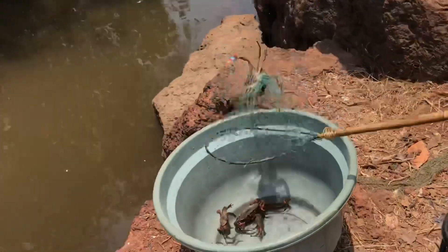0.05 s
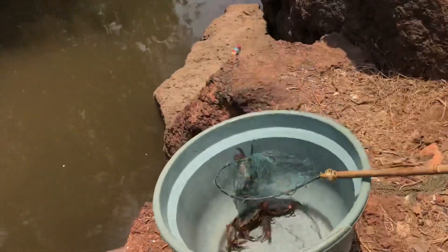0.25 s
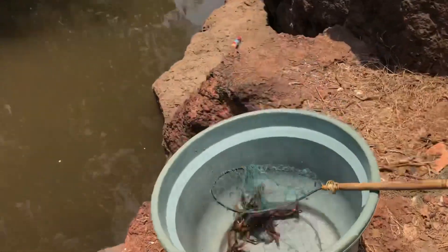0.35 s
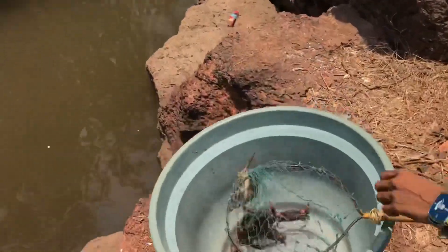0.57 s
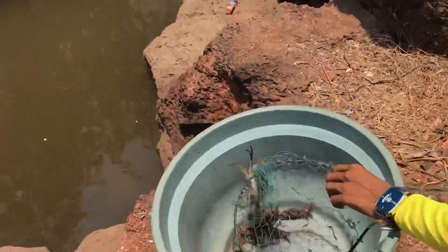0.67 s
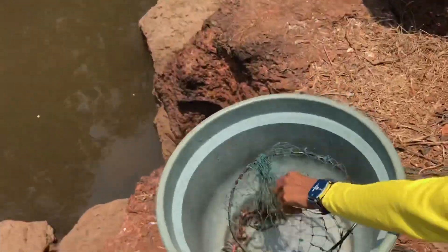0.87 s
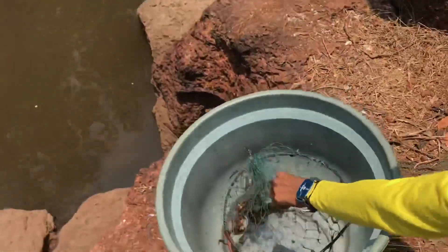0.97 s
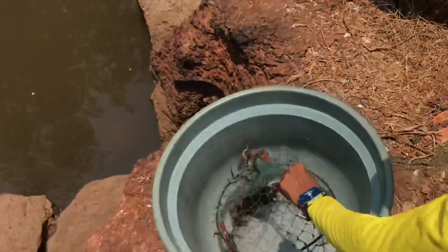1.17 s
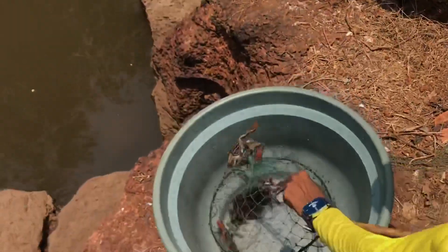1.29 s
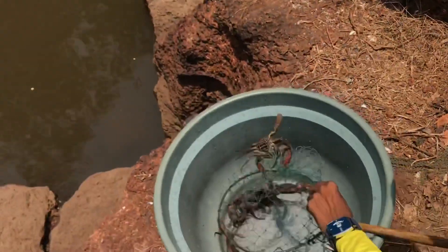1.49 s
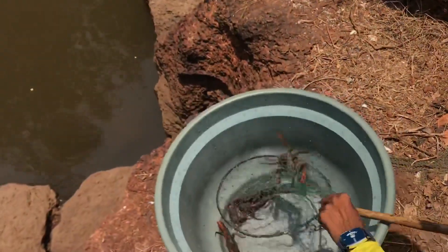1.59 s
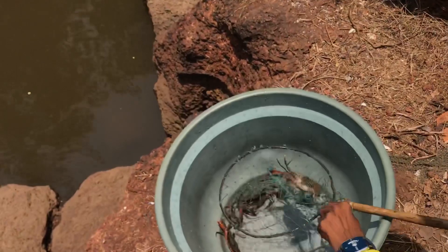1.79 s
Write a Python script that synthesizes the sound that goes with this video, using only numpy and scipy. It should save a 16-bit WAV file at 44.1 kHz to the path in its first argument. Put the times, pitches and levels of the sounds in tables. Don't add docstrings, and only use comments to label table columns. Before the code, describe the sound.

A net of crabs drops into a plastic tub: wet mesh crackles faintly, then at 0.2 s hoop and shells hit with a loud hollow clatter and short floor thump, rattling and scrabbling until about 0.5 s. Sparse snaps and ticks follow. From 1.1 s the net is handled, with a heavy knock at 1.16 s and separate knocks near 1.37, 1.57 and 1.7 s. Close, short tub echo, faint low hum and distant insects.

```python
import sys
import numpy as np
from scipy import signal
from scipy.fft import rfft, irfft
from scipy.io import wavfile
from scipy.ndimage import uniform_filter1d

SR = 44100
rng = np.random.default_rng(int(sys.argv[2]) if len(sys.argv) > 2 else 0)


def wav_record(signal):
    frames = np.transpose(np.atleast_2d(signal))
    bounded = np.clip(frames, -1, 1)
    quanta = np.round(bounded * 32767).astype(np.int16)
    wavfile.write(sys.argv[1], SR, quanta)


def gain_from_db(level_db):
    decades = np.asarray(level_db, float) / 20
    return 10 ** decades


N = 81585
T = np.arange(N) / SR

# [f/Hz, level/dB per Hz]
AIR_COLOUR = [(40, 5), (110, -2.5), (300, -13.5), (1000, -18), (3000, -20.5), (9000, -23.5), (11600, -35),
              (15500, -28.5)]
INSECT_BANDS = [6650, 7100, 7600]
# [t/s, level/dB]
HUM_LEVEL = [
    (0, -61.5),
    (.2, -63.5),
    (1.3, -52.5),
    (1.85, -62.5),
]
# [t/s, level/dB, share of bright mesh/dB]
ACTIVITY = [(0, -68, 12), (0.168, -69.5, -5), (0.208, -36.5, -1.5), (0.329, -41.5, 4.5), (.41, -54.5, 3),
            (.62, -58.5, 13), (1.0, -69, 10.5), (1.087, -53.5, 9), (1.111, -56.5, 11), (1.28, -50, -2),
            (1.35, -44, 2.5), (1.44, -52.5, 3), (1.5, -57, 9), (1.66, -54.5, -5), (1.688, -49.5, 0.5),
            (1.76, -55.5, 3.5), (1.85, -64, 4)]
# [f/Hz, level/dB per Hz]
LEG_COLOUR = [(500, -10), (1000, 7), (1800, 0.5), (3000, -2.5), (5000, -2.5), (9000, -27)]
# [f/Hz, level/dB per Hz]
MESH_COLOUR = [(1760, -10.5), (3000, -4.5), (8750, -6.5), (10200, -4.5), (15100, -3.5), (16500, -1)]
# [f/Hz, level/dB per Hz]
SHELL_COLOUR = [(590, -5.5), (1200, -2.5), (2700, -13), (3520, -8.5), (9000, -29), (11700, -34.5),
                (19800, -120)]
# [t/s, peak level/dB, f/Hz, length/ms]
TICK_EVENTS = [(0.2302, -23, 2200, 3.4), (0.237, -28, 4670, 5), (0.2558, -29.5, 4200, 2.8),
               (0.2915, -34, 1500, 3.6), (0.309, -25, 1250, 6.2), (0.3492, -36, 3040, 6.6),
               (0.431, -51, 2400, 4.2), (0.4678, -41.5, 2400, 4.6), (0.484, -39, 4570, 2.7),
               (0.5636, -39.5, 2960, 4), (0.5895, -41, 2900, 2.3), (0.717, -43.5, 1710, 7.8),
               (0.801, -47, 4030, 1.5), (0.8216, -46.5, 1930, 4.4), (0.835, -47, 12500, 2),
               (0.8986, -46.5, 2200, 1.4), (1.075, -41, 3800, 15), (1.082, -39.5, 7100, 8.9),
               (1.1295, -38, 2080, 2.8), (1.2176, -41.5, 4130, 4.4), (1.263, -39, 12000, 2.6),
               (1.273, -26.5, 4200, 2.6), (1.2733, -20, 9800, 2.7), (1.2805, -38, 3000, 4),
               (1.288, -35, 2550, 4), (1.3206, -44, 2500, 1.8), (1.3368, -33, 1510, 3),
               (1.339, -35, 14500, 4.4), (1.3448, -34.5, 4100, 5), (1.3652, -29.5, 2220, 1.8),
               (1.4003, -30.5, 4900, 2.2), (1.4255, -34.5, 1880, 4.3), (1.436, -42, 4160, 12),
               (1.6237, -46, 2960, 12), (1.632, -46, 12100, 1.7), (1.671, -55, 2200, 10),
               (1.6772, -38, 2390, 5.5), (1.684, -39, 2000, 6.7), (1.6886, -44, 2500, 5.1),
               (1.693, -39, 2200, 6.8), (1.702, -27.5, 3770, 3.3), (1.718, -42, 4000, 2.1),
               (1.7522, -37, 1760, 7.6), (1.8033, -40.5, 6400, 1.8)]
# [t/s, peak level/dB, length/ms]
SNAP_EVENTS = [(0.087, -40, 4.3), (0.153, -25, 18), (0.204, -21, 2.3), (0.22, -28, 4.1), (0.2804, -41, 5.2),
               (0.284, -13.5, 4.1), (0.308, -25, 2.9), (0.43, -27, 3.2), (0.46, -36, 4.3),
               (0.467, -32.5, 4), (0.562, -37.5, 3.6), (0.6597, -36.5, 3.3), (0.669, -32.5, 7.2),
               (0.675, -38, 5.8), (0.681, -40, 5), (0.7458, -32.5, 2.6), (1.1306, -24, 2.3),
               (1.1364, -22, 4.8), (1.1461, -21, 7.4), (1.1743, -30, 3.7), (1.2186, -35.5, 7.5),
               (1.271, -29, 3.3), (1.2731, -17, 1.4), (1.2805, -20.5, 2), (1.296, -26.5, 5.5),
               (1.3058, -29, 6.2), (1.3115, -37, 2.5), (1.333, -30.5, 2.7), (1.3635, -41, 1.5),
               (1.3765, -39, 2.9), (1.4225, -34.5, 7.5), (1.4439, -29.5, 4.5), (1.6495, -34, 7),
               (1.6886, -33, 4), (1.7, -35, 2.7), (1.7035, -16.5, 1.9), (1.7077, -32, 2.4),
               (1.715, -31, 3.6), (1.767, -40, 5)]
# [t/s, peak level/dB, f/Hz, length/ms]
CLACK_EVENTS = [(0.0117, -31, 3630, 0.85), (0.157, -35, 1780, 14), (0.197, -23, 3690, 14),
                (0.2029, -11.5, 2220, 3.4), (0.221, -12.5, 1890, 3.9), (0.2565, -21.5, 1560, 4.6),
                (0.2815, -16.5, 3560, 7.1), (0.2847, -18, 3500, 3.8), (0.3091, -27, 3870, 9.6),
                (0.339, -24.5, 1370, 9), (0.43, -35, 5400, 5.2), (0.5244, -31, 3350, 3.2),
                (0.747, -45, 2280, 6.5), (1.077, -43, 1750, 8.4), (1.141, -33.5, 2080, 8.9),
                (1.1607, -21, 1840, 4.5), (1.311, -36, 1900, 4.1), (1.373, -25, 1580, 3),
                (1.4415, -28.5, 4920, 8.3), (1.566, -32.5, 1647, 4.4), (1.7429, -37, 1490, 9.1),
                (1.8042, -32.5, 2800, 2.4)]
# [t/s, peak level/dB, f/Hz, t60/s]
BOOM_EVENTS = [(0.202, -12.5, 193, 0.028), (0.237, -26, 152, 0.063), (0.342, -24, 246, 0.049),
               (0.362, -32.5, 161.7, 0.13), (0.452, -33.5, 256.7, 0.15), (1.163, -27, 164.7, 0.19),
               (1.165, -28, 271.7, 0.085), (1.22, -39, 133, 0.16), (1.282, -35, 240.4, 0.16),
               (1.339, -35.5, 260, 0.34), (1.394, -41, 190.6, 0.21), (1.461, -41, 107, 0.063),
               (1.566, -26.5, 161, 0.15), (1.694, -40, 164, 0.16), (1.785, -42.5, 183, 0.12)]
# [f/Hz, level/dB, t60/s]
WALL_MODES = [(615, -7, .06), (700, -8, .04), (830, -6, .035), (1050, -10, .03), (1280, -7, .04),
              (1850, -18, .025)]
# [t/s, peak level/dB, f/Hz of the struck panel, contact/ms]
KNOCK_EVENTS = [(0.2, -15.5, 532, 0.95), (0.205, -19.5, 650, 2), (0.222, -15.5, 567, 2.04),
                (0.237, -20, 610, 1.7), (0.257, -26.5, 598, 4), (0.281, -24, 1070, 2.2),
                (0.287, -26.5, 634, 6.5), (0.308, -27.5, 1050, 4.7), (0.326, -22.5, 640, 0.91),
                (0.338, -20, 731, 7.6), (0.35, -22.5, 602, 3.1), (0.39, -30, 640, 2.3),
                (0.447, -37, 637, 5.7), (0.633, -49, 667, 2.9), (0.819, -51, 683, 6.2),
                (1.085, -46, 436, 5.3), (1.147, -36, 996, 3.2), (1.159, -27, 1060, 8.7),
                (1.162, -14.5, 808, 2), (1.169, -17.5, 675, 5.3), (1.214, -29, 790, 2.4),
                (1.261, -40.5, 760, 2.5), (1.274, -35, 950, 3), (1.288, -35, 910, 1.5),
                (1.32, -30.5, 750, 2.4), (1.336, -27.5, 780, 2), (1.345, -44, 780, 1.3),
                (1.362, -40, 835, 2.2), (1.372, -17.5, 876, 1.05), (1.38, -27.5, 665, 5.3),
                (1.497, -50, 874, 6.6), (1.52, -44.5, 780, 6.6), (1.568, -19.5, 762, 1.9),
                (1.643, -36, 866, 2.2), (1.688, -38, 890, 6.7), (1.783, -38.5, 760, 2.1),
                (1.813, -28, 745, 3.5)]


def evened(x):
    return x / np.sqrt(np.mean(x ** 2) + 1e-20)


def peaked(x):
    return x / (abs(x).max() + 1e-20)


def colour(x, spectrum):
    f, db = np.transpose(spectrum)
    hz = np.fft.rfftfreq(len(x), 1 / SR) + 1
    skirt_db = -18 * np.maximum(np.log2(f[0] / hz), 0)
    gain = gain_from_db(np.interp(np.log(hz), np.log(f), db) + skirt_db)
    return irfft(rfft(x) * gain, len(x))


def resonate(x, hz, width_hz):
    r = np.exp(-np.pi * width_hz / SR)
    pole = r * np.exp(2j * np.pi * hz / SR)
    return 2 * signal.lfilter([1 - r], [1, -pole], x).real


def resonate_twice(x, hz, width_hz, second_width_hz):
    return resonate(resonate(x, hz, width_hz), hz, second_width_hz)


def ring(modes, size=6000):
    t = T[:size]
    return sum(gain_from_db(db - 60 * t / max(t60, .005)) * np.sin(2 * np.pi * hz * t) for hz, db, t60 in modes)


def burst(noise, ms, lead=0.06):
    u = T[:len(noise)] * 1000 / max(ms, .3)
    return noise * (1 - np.exp(-u / lead)) * np.exp(-u * 1.32)


def gritty(count, size=2048):
    lumps = uniform_filter1d(rng.standard_normal((count, size)), size=24, axis=1)
    return rng.standard_normal((count, size)) * gain_from_db(20 * lumps)


def taps(per_s, ms):
    spread_db = 0.5 * np.minimum(rng.exponential(1, N), 3.5)
    size = (rng.random(N) < per_s / SR) * gain_from_db(spread_db)
    return signal.fftconvolve(size, burst(np.ones(600), ms))[:N] * rng.standard_normal(N)


def add(mix, s, sound):
    part = mix[round(s * SR):][:len(sound)]
    part += sound[:len(part)]


def bank():
    air_noise, insect_noise, hum_noise = rng.standard_normal((3, N))
    air = evened(colour(air_noise, AIR_COLOUR))
    insects = evened(sum(resonate_twice(insect_noise, hz, 750, 750) for hz in INSECT_BANDS))

    hum_hz, width_hz = 72, 12
    waver = evened(resonate_twice(hum_noise, hum_hz, width_hz, 3 * width_hz))
    hum = evened(waver + 2 * np.sin(2 * np.pi * hum_hz * T))
    hum_db = np.interp(T, *np.transpose(HUM_LEVEL))
    return gain_from_db(-55.5) * air + gain_from_db(-61.5) * insects + gain_from_db(hum_db) * hum


def scrabble():
    s, level_db, bright_db = np.transpose(ACTIVITY)
    legs = np.zeros(N)
    for hz in np.geomspace(300, 7000, num=6):
        legs += np.sqrt(7000 / hz) * resonate(taps(900 / 3, 3.5), hz, hz * .6)
    wall = gain_from_db(-8) * evened(signal.fftconvolve(legs, ring(WALL_MODES))[:N])
    floor = gain_from_db(-2.5) * evened(resonate_twice(legs, 183, 230, 290))
    threads_db = -9 + np.interp(T, s, bright_db)
    threads = gain_from_db(threads_db) * evened(colour(taps(630, 4.2), MESH_COLOUR))
    return gain_from_db(np.interp(T, s, level_db)) * (evened(colour(legs, LEG_COLOUR)) + wall + floor + threads)


def ticks():
    out = np.zeros(N)
    for (s, db, hz, ms), noise in zip(TICK_EVENTS, gritty(count=len(TICK_EVENTS))):
        width_hz = hz * .36
        tone = resonate_twice(noise, hz, width_hz, 2 * width_hz)
        add(out, s - .0003, gain_from_db(db) * peaked(burst(tone, ms)))
    return out


def snaps():
    out = np.zeros(N)
    for (s, db, ms), noise in zip(SNAP_EVENTS, gritty(count=len(SNAP_EVENTS))):
        add(out, s - .0005, gain_from_db(db) * peaked(burst(colour(noise, MESH_COLOUR), ms)))
    return out


def clacks():
    out = np.zeros(N)
    for (s, db, hz, ms), noise in zip(CLACK_EVENTS, gritty(count=len(CLACK_EVENTS))):
        width_hz = hz * 0.42
        tone = evened(resonate_twice(noise, hz, width_hz, 2 * width_hz))
        tone = evened(tone + np.sin(2 * np.pi * hz * T[:len(noise)]))
        body_db = 11 + 1.25 * (db + 15)
        body = gain_from_db(body_db) * evened(colour(noise, SHELL_COLOUR))
        add(out, s - .0005, gain_from_db(db) * peaked(burst(tone + body, ms)))
    return out


def booms():
    out = np.zeros(N)
    rise_s, roughness = 0.00059, 0.047
    for (s, db, hz, t60), noise in zip(BOOM_EVENTS, rng.standard_normal((len(BOOM_EVENTS), 9000))):
        drum = ring([(hz, 0, t60), (hz * 1.55, -13.5, t60 * 0.88)], size=9000)
        drift = uniform_filter1d(uniform_filter1d(noise, size=700), size=700)
        drum = drum * (1 + roughness * evened(drift))
        swell = 1 - np.exp(-T[:len(drum)] / rise_s)
        add(out, s, gain_from_db(db) * peaked(drum * swell))
    return out


def knocks():
    out = np.zeros(N)
    for (s, db, hz, ms), noise in zip(KNOCK_EVENTS, rng.standard_normal((len(KNOCK_EVENTS), 1500))):
        wall = [(f * (1 + .02 * e), g, t60) for (f, g, t60), e in zip(WALL_MODES, noise)]
        panel = (hz, 0, 0.009)
        push = np.sin(2 * np.pi * hz * T[:len(noise)]) + 1.6 * uniform_filter1d(noise, size=6)
        blow = signal.fftconvolve(burst(push, ms, 1.0), ring(wall + [panel]))
        add(out, s + 0.00048, gain_from_db(db) * peaked(blow))
    return out


def echoes(x):
    scatter = np.zeros(8000)
    at = np.arange(100, 7980, 20)
    scatter[at + rng.integers(0, 20, len(at))] = rng.choice([-1., 1.], len(at))
    scatter *= gain_from_db(-60 * T[:8000] / .06)
    return signal.fftconvolve(x, scatter / np.linalg.norm(scatter))[:N]


def scene():
    background = bank()
    tub = scrabble() + clacks() + booms() + knocks()
    return (background + ticks() + snaps() + tub + gain_from_db(-12) * echoes(tub))[None]


def low_pass(x):
    return signal.sosfilt(signal.butter(12, 16820, fs=SR, output="sos"), x)


def record(dry):
    x = signal.sosfilt(signal.butter(4, 55, "high", fs=SR, output="sos"), dry)
    edge = signal.firwin(401, 15850, window=("kaiser", 6), fs=SR)[None]
    ceiling = signal.firwin(401, 16500, window=("kaiser", 9), fs=SR)[None]
    low = signal.oaconvolve(x, edge, "same")
    top = signal.oaconvolve(x, ceiling, "same") - low
    is_loud = uniform_filter1d(top ** 2, size=900) > gain_from_db(2 * -55)
    gate = uniform_filter1d(1. * is_loud, size=200)
    return low_pass(low + .5 * top * gate)


dry = scene()
out = record(dry)
wav_record(out)
```